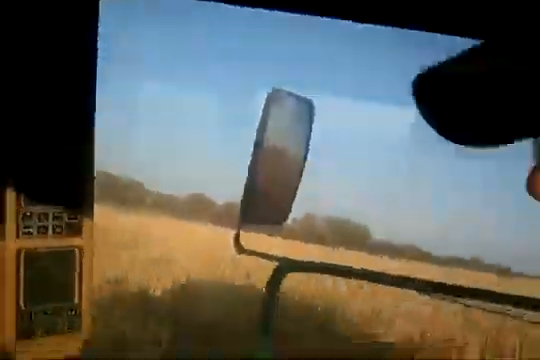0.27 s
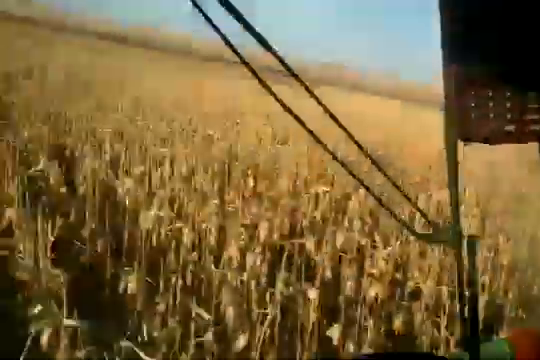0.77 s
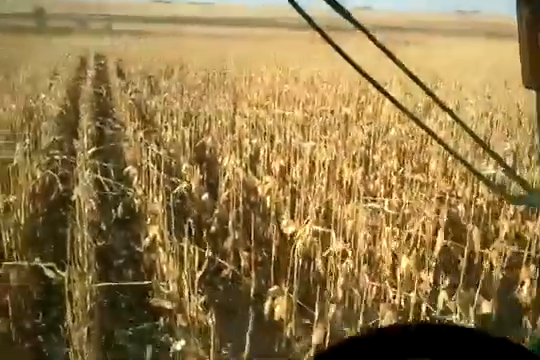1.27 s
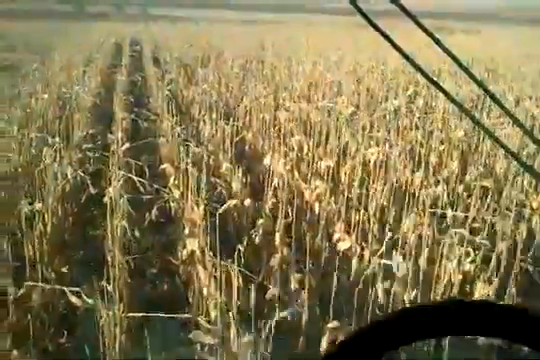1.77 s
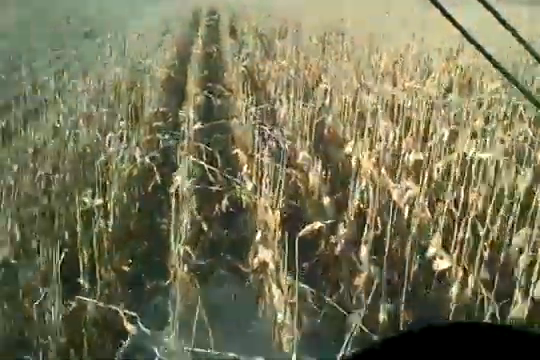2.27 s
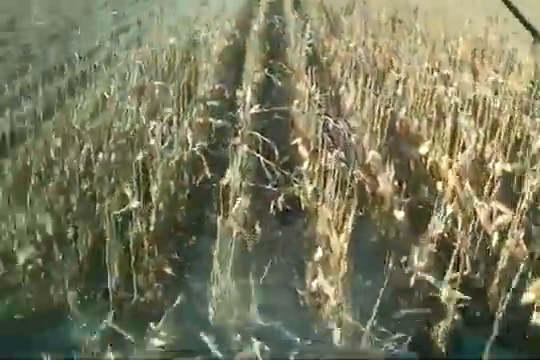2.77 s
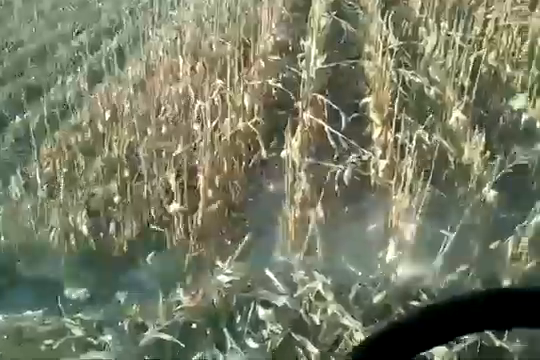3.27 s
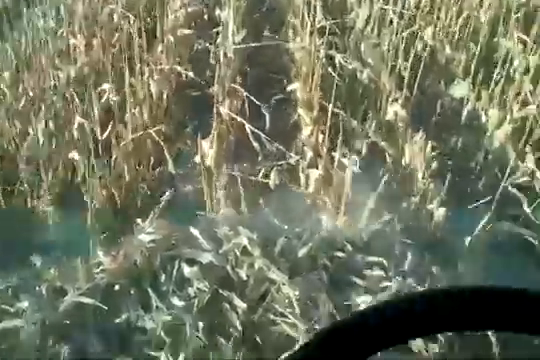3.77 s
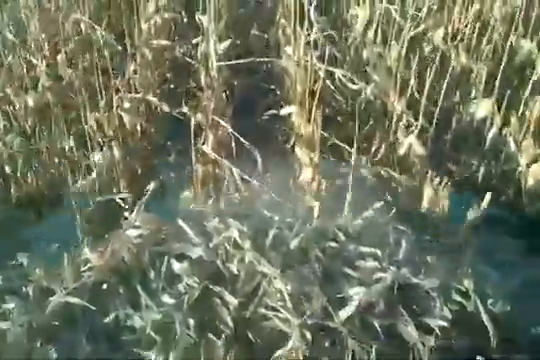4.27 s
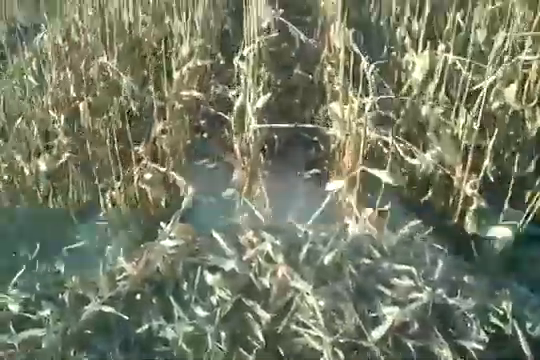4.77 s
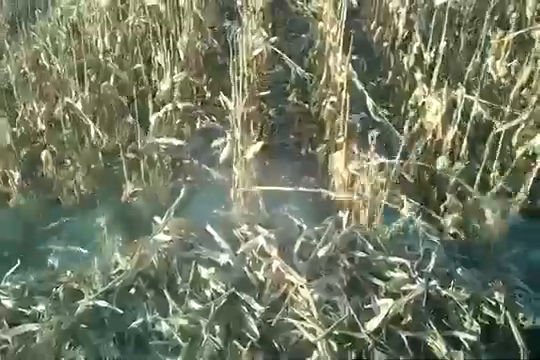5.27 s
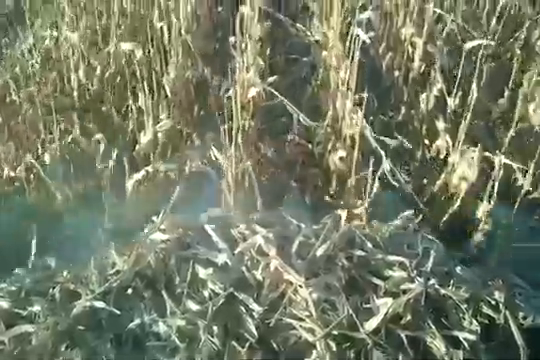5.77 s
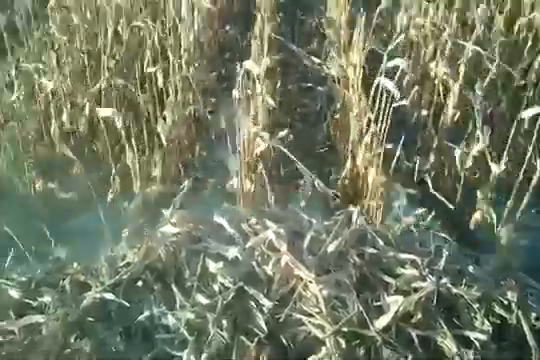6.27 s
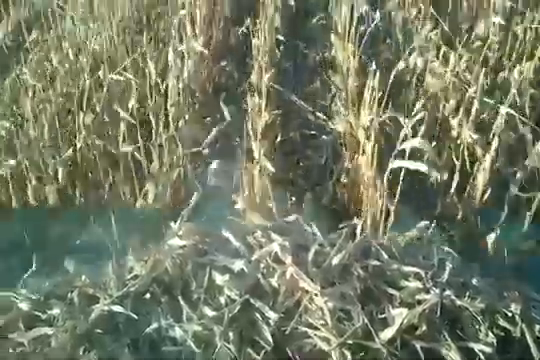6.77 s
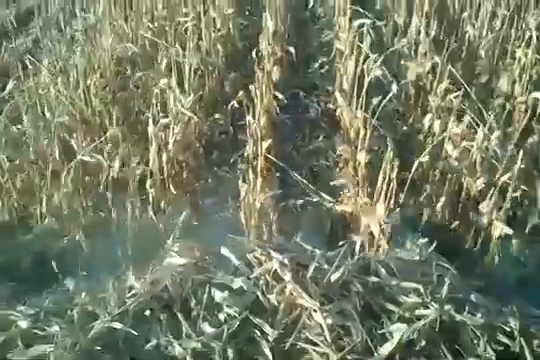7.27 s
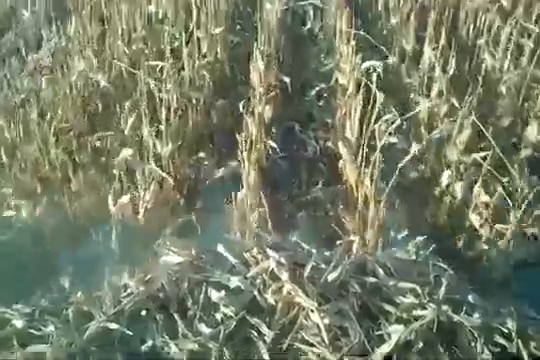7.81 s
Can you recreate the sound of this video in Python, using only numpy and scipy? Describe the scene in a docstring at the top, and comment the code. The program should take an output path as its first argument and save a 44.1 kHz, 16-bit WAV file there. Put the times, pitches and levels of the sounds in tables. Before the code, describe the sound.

From 0 s a combine harvester is already running under load, heard in its cab: deep throbbing of unbalanced shafts, floor boom, panel drone, engine and belt hums and a fan tone. A noisy, airy rush of dry crop hisses at the side, with a small clattering burst at once. From about 1 to 2 s the main gear whine comes forward, wavering, and the machine sags very slightly in pitch near 1.2 and 1.8 s. Between 2 and 4.5 s the microphone turns to the windscreen: the airy hiss thins while grainy stalk crackle and sheet-metal rattle grow, with sharper bursts around 3.6 s. A thin header whine also shows. From 5 to 8 s the steady roar continues with uneven surges, short low hum swells, more knocks near 7.2 and 7.5 s and another slight sag around 7.4 s. Bass overload pumps and roughens everything; it ends still running.

```python
"""Combine harvester, heard in the cab

A combine harvester cuts a dry standing crop. Sines make the throbbing unbalanced shafts, hums, fan and
gear whines; shaped noise makes the cab's boom and drone; random snaps and noise make the stalks and hiss.
Short sine swells unsettle the boom, drone and hum; decaying sines ring the header panels.
The microphone turns from the side window to the windscreen, and the loud bass overloads it."""
import sys
import numpy as np
from scipy import signal
from scipy.fft import rfft, irfft
from scipy.io import wavfile

SR = 44100
rng = np.random.default_rng(int(sys.argv[2]) if len(sys.argv) > 2 else 0)


def int16_out(signal):
    """Quantize to a 16-bit WAV file."""
    q = np.round(np.clip(np.atleast_2d(signal).T, -1, 1) * 32767)
    wavfile.write(sys.argv[1], SR, q.astype(np.int16))


N = 354652
TIME = np.arange(N) / SR  # s
BINS = np.fft.rfftfreq(N, 1 / SR)  # Hz

# uneven rise and fall of the rush, hiss and rattle: (time [s], level change [dB])
RUSH_LEVEL = [(0, -1), (.1, 0), (.2, 0.5), (.48, -0.3), (.57, 0.8), (.75, -1), (1.05, 0), (1.16, 1.1),
              (1.28, .5), (1.55, -0.5), (1.8, 1.2), (2, -1.5), (2.55, -1), (2.72, -2), (2.86, -0.5), (3, 0),
              (3.49, 0.2), (3.57, 1), (3.68, 2.2), (3.76, -1), (4.2, 2.5), (4.31, -3.5), (4.45, 1.4),
              (4.8, 0), (4.94, 1.5), (5.12, -.5), (5.42, 0.5), (5.8, -0.3), (6, 1.3), (6.38, -2), (6.55, 1),
              (6.76, 2.8), (6.9, -2.8), (7.08, -1.5), (7.22, 1.5), (7.35, -1), (7.52, 2.5), (7.68, -1),
              (8, 4)]
# spectrum of the rush, facing the header: (frequency [Hz], relative density [dB per Hz])
RUSH_FRONT = [(300, -3), (700, -1), (770, -3), (845, -1), (940, -1.5), (1050, 0), (1250, -0.5), (1480, 1),
              (1850, 1.4), (2150, -0.9), (2400, -1.7), (2700, -6), (3000, -10.5), (3600, -16.5),
              (5000, -36.5)]
# ringing modes of the header's sheet metal: (frequency [Hz], relative level [dB], t60 [s])
PANELS = [(839.4, 1.5, 0.094), (1043, -3, .06), (1365, -2.5, 0.13), (1521, -1, 0.08), (1747, -2, .06),
          (1850, -3.5, 0.056), (2020, -3.5, 0.058), (2470, -4, .05), (3100, -12, .03), (4350, -12, .02),
          (5770, -11.5, 0.013)]


def gain_of(db):
    """Decibels to amplitude."""
    return 10 ** (np.asarray(db) / 20)


def evened(x):
    """Scales to an rms of one."""
    return x / np.sqrt(np.mean(x ** 2) + 1e-20)


def blend(start, end, share):
    """Moves from start to end as share goes from zero to one."""
    return start + share * (end - start)


def follow(rows):
    """Columns of a timed table, interpolated to one value a sample."""
    s, *columns = np.transpose(rows)
    return [np.interp(TIME, s, column) for column in columns]


def humps(rows):
    """Sum of cosine-squared humps: (centre [s], full length [s], peak size)."""
    total = 0
    for centre_s, length_s, size in rows:
        position = np.clip((TIME - centre_s) / length_s, -.5, .5)
        total = total + size * np.cos(np.pi * position) ** 2
    return total


def wander(rate_hz):
    """Slow random curve of unit rms, with changes up to about the given rate."""
    spectrum = rfft(rng.standard_normal(N)) / (1 + (BINS / rate_hz) ** 4)
    return evened(irfft(spectrum, N))


def tone(hz, sway_rad=0):
    """Sine of unit rms along a pitch curve, its phase pushed by sway_rad."""
    return np.sqrt(2) * np.sin(2 * np.pi * np.cumsum(hz) / SR + sway_rad)


def coloured(x, spectrum):
    """Shapes x by a spectrum that falls away beyond both end points; unit rms."""
    hz, db = np.transpose(spectrum)
    shape = gain_of(np.interp(np.log(BINS + 1), np.log(hz), db))
    shape /= np.maximum(BINS / hz[-1], 1) ** 2
    shape *= np.minimum(BINS / hz[0], 1)
    return evened(irfft(rfft(x) * shape, N))


def resonate(x, hz, width_hz):
    """Resonance of gain one at a moving centre: shift to 0 Hz, one-pole low-pass, shift back."""
    turn = np.exp(2j * np.pi * np.cumsum(hz) / SR)
    r = np.exp(-np.pi * width_hz / SR)
    return 2 * (turn * signal.lfilter([1 - r], [1, -r], x / turn)).real


def snaps(per_s, spread_db, share):
    """Random snaps of uneven size; share is their part of the power, the rest is noise."""
    size = gain_of(spread_db * np.minimum(rng.exponential(1, N), 4))
    clicks = size * rng.choice([-1, 1], N) * (rng.random(N) < per_s / SR)
    share = np.clip(share, 0, 1)
    return np.sqrt(share) * evened(clicks) + np.sqrt(1 - share) * rng.standard_normal(N)


def shafts(speed, lean):
    """Unbalanced shafts shake the cab: fast beats with slow at 6.6 Hz, and with its twin in long waves."""
    fast_hz, slow_hz = 32.22, 25.65  # at full speed
    slow_db = -22
    # fast shaft's shake: (time [s], mean level [dB])
    shake = [(.3, -17), (.7, -21), (1.6, -17.5), (2.8, -17.5), (3.3, -18), (4.25, -18), (5.6, -19.5),
             (6.3, -15), (7.2, -15)]
    # times [s] when the slipping twin opposes the fast shaft
    cancels_s = [0, .87, 2.2, 3.63, 4.97, 6.66, 7.8, 9.2]
    sway_rad = 0.2 * wander(4.0)
    slip_rad = 2 * np.pi * np.interp(TIME, cancels_s, np.arange(len(cancels_s)))
    twin_share = blend(0.28, 0.55, lean)  # of the fast shaft's amplitude: seat, windscreen
    twin = twin_share * tone(fast_hz * speed, sway_rad - slip_rad)
    pair = tone(fast_hz * speed, sway_rad) - twin
    fast = gain_of(follow(shake)[0] + 1.0 * wander(2.0)) * pair
    slow = gain_of(slow_db + 1.2 * wander(1.4)) * tone(slow_hz * speed, 0.086 * wander(5.3))
    return fast + slow


def partials(table, speed, position, flutter_db, sway_rad, rate_hz):
    """Tones geared to the drive; the uneven load flutters each in level and phase."""
    out = np.zeros(N)
    for hz, start_db, end_db in table:
        level_db = blend(start_db, end_db, position) + flutter_db * wander(rate_hz)
        phase_rad = sway_rad * wander(rate_hz) + 2 * np.pi * rng.random()
        out += gain_of(level_db) * tone(hz * speed, phase_rad)
    return out


def drive(speed, facing, lean):
    """Gear whines, fan and hums; the cab's standing waves set how loud each is at the microphone."""
    whine_hz, header_hz, fan_hz = 1437.3, 2310.8, 516.6  # at full speed
    # main gear whine, coming and going: (time [s], mean level [dB])
    whine_levels = [(.12, -39), (.43, -30.5), (.52, -41), (.83, -39), (.95, -44), (1.03, -33.5),
                    (1.25, -30), (1.47, -32.5), (1.58, -35), (1.74, -32), (1.93, -31), (2, -46),
                    (2.15, -40), (2.33, -35), (2.55, -28.5), (2.8, -36.5), (3.1, -29.5), (3.55, -40),
                    (3.8, -31), (4.3, -34), (4.5, -33.5), (5.4, -34.5), (6.15, -38.5), (6.7, -35),
                    (7.4, -39.5), (8, -32)]
    # header drive's thin whine, louder as the microphone turns toward it: (time [s], mean level [dB])
    header_levels = [(.1, -41.5), (.75, -40.5), (1.1, -54), (1.5, -44), (2.05, -54), (2.45, -40),
                     (3.3, -39), (3.65, -33.5), (4.2, -43.5), (4.95, -32), (5.2, -36.5), (5.9, -36),
                     (7.3, -37.5), (8, -37.5)]
    # fan's blade tone, fading as the microphone turns away: (time [s], mean level [dB])
    fan_levels = [(.5, -30), (1.3, -25.5), (2.4, -26.5), (3.4, -29.5), (4.4, -30), (5.6, -36), (7.1, -29.5),
                  (7.5, -36), (8, -31.5)]
    # engine and belt hums: (full-speed frequency [Hz], mean level at seat [dB], at windscreen [dB])
    hum_rows = [(64.6, -31, -30), (105, -31, -27.5), (116.4, -25.5, -29), (148.3, -32, -42),
                (174.6, -38, -41), (248.3, -33, -31), (323.7, -34, -37), (391.6, -24.8, -37),
                (409.1, -30, -36), (485.8, -35.5, -36), (615, -47, -44), (647, -40, -50), (809, -47, -50)]
    # lesser gears: (full-speed frequency [Hz], mean level facing side window [dB], facing header [dB])
    gear_rows = [(1155.4, -50, -48), (2584.7, -51, -50), (2642.5, -44, -47.5)]
    whine_db = follow(whine_levels)[0] + 1.9 * wander(14) + 1.3 * wander(45)
    whine = gain_of(whine_db) * tone(whine_hz * speed, 0.53 * wander(20) + 0.2 * wander(60))
    header_db = follow(header_levels)[0] + 1.8 * wander(16)
    header = gain_of(header_db) * tone(header_hz * speed, 0.44 * wander(30))
    fan_db = follow(fan_levels)[0] + 2.4 * wander(24)
    fan = gain_of(fan_db) * tone(fan_hz * speed, 0.2 * wander(10))
    hums = partials(hum_rows, speed, lean, flutter_db=1.5, sway_rad=0.16, rate_hz=12)
    gears = partials(gear_rows, speed, facing, flutter_db=3.5, sway_rad=0.19, rate_hz=15)
    return whine + header + fan + hums + gears


def cab(lean):
    """The threshing shakes the floor and sets the panels droning: shaped noise."""
    boom_db, boom_lean_db = -17, 0.1  # at the seat; change toward the windscreen
    seat_db, front_db = -19.5, -20
    # floor boom: (frequency [Hz], relative density [dB per Hz])
    boom_spectrum = [(10, -18), (20, -9), (28, -3), (37, -1.5), (47, 5.5), (62, -2), (85, -1.5),
                     (104, -0.5), (116, -4.5), (130, -7), (180, -19.5), (400, -36)]
    # panel drone at the seat: (frequency [Hz], relative density [dB per Hz])
    seat_spectrum = [(90, -13), (120, -0.5), (150, 4), (175, 2), (205, -1.5), (245, 1), (280, -1),
                     (350, -7), (400, -2.5), (450, -8), (500, -7), (580, -14), (750, -17), (1500, -35.5)]
    # panel drone at the windscreen: (frequency [Hz], relative density [dB per Hz])
    front_spectrum = [(90, -22.5), (140, -2.5), (170, 0), (205, 0), (240, 2), (275, 1), (310, -5.5),
                      (355, -7.5), (400, -6.5), (450, -8.5), (495, -4.5), (570, -11), (750, -16.5),
                      (1500, -31)]
    boom = gain_of(boom_db + boom_lean_db * lean) * coloured(rng.standard_normal(N), boom_spectrum)
    seat = gain_of(seat_db) * coloured(rng.standard_normal(N), seat_spectrum)
    front = gain_of(front_db) * coloured(rng.standard_normal(N), front_spectrum)
    return boom + np.sqrt(1 - lean) * seat + np.sqrt(lean) * front


def crop(facing, lean):
    """Dry stalks break in the header in clumps: noise to the side, snaps and noise in front."""
    rush_side_db, rush_front_db = -26.5, -24  # before rush level and clumps
    chaff_side_db, chaff_front_db = -33, -33  # before rush level, clumps and the two changes below
    chaff_lean_db, chaff_turn_db = 9.5, -17.5  # side hiss: leaning up, turning away
    # stalk rush at the side window: (frequency [Hz], relative density [dB per Hz])
    rush_side = [(300, -14.5), (650, 3.5), (760, 1), (840, 5.5), (950, 3), (1100, 3), (1250, 2.5),
                 (1450, 0), (1750, -2), (2100, -4), (2600, -7.5), (3200, -19), (5000, -31)]
    # chaff hiss at the side window: (frequency [Hz], relative density [dB per Hz])
    chaff_side = [(1500, -21.5), (3000, 5.5), (4300, 7), (5000, 6), (5800, 4), (6400, 1), (6900, -8),
                  (7300, -19.5)]
    # chaff hiss facing the header: (frequency [Hz], relative density [dB per Hz])
    chaff_front = [(1500, -17), (3500, -7), (4300, -0.5), (4800, -2.5), (5400, 3), (5900, 2.5),
                   (6400, -4.5), (6900, -16.5), (7300, -40)]
    clumps_db = .5 * wander(60)
    side, front = np.sqrt(1 - facing), np.sqrt(facing)
    rush = side * gain_of(rush_side_db) * coloured(rng.standard_normal(N), rush_side)
    rush += front * gain_of(rush_front_db) * coloured(snaps(1500, 3.3, 0.4), RUSH_FRONT)
    hiss_db = chaff_side_db + chaff_lean_db * lean + chaff_turn_db * facing
    chaff = side * gain_of(hiss_db) * coloured(rng.standard_normal(N), chaff_side)
    chaff += front * gain_of(chaff_front_db) * coloured(snaps(1800, 3.1, 0.55), chaff_front)
    return gain_of(follow(RUSH_LEVEL)[0] + clumps_db) * (rush + chaff)


def tonal_swells():
    """Short unsteady swells of the cab's boom, drone and hum: sines under smooth humps."""
    # swells: (centre time [s], length [s], frequency [Hz], peak level before flutter [dB])
    swell_rows = [(0.41, 0.16, 248, -25), (0.592, 0.5, 104, -23), (.84, 0.18, 400, -24.5),
                  (1.025, 0.32, 119, -22), (1.17, 0.13, 403, -22.5), (1.306, 0.26, 133, -18),
                  (1.583, 0.54, 114, -16.5), (2.115, 0.31, 113.7, -22), (2.994, 0.14, 245, -21),
                  (3.406, 0.45, 113.7, -17.5), (3.797, 0.11, 402.6, -20), (3.856, 0.23, 116, -18.5),
                  (4.093, .3, 112.3, -16.5), (4.098, 0.2, 241.4, -25.5), (4.364, 0.13, 245, -24.5),
                  (4.743, 0.4, 109.3, -23), (5.25, 0.3, 105, -18), (6.063, .18, 239.7, -24),
                  (6.142, 0.23, 107.4, -19.5), (6.81, 0.17, 242.5, -22), (7.23, 0.13, 116.4, -18),
                  (7.653, 0.28, 106, -20.5), (7.687, 0.21, 238, -19.5), (7.93, 0.33, 246, -22)]
    sway_rad = 0.44 * wander(21)
    flutter = gain_of(2.0 * wander(27))
    out = np.zeros(N)
    for s, length_s, hz, db in swell_rows:
        swell = humps([(s, length_s, gain_of(db))])
        out += swell * tone(np.full(N, hz), sway_rad + 2 * np.pi * rng.random())
    return flutter * out


def ring(hz, db, t60_s):
    """One panel mode's dying ring: a decaying sine, 1/8 s long."""
    t = TIME[:SR // 8]
    return gain_of(db - 60 * t / t60_s) * np.sin(2 * np.pi * hz * t)


def rattle(facing):
    """The header's panels ring, each under its own uneven stream of random blows."""
    side_db, front_db = -38, -30.5  # before rush level
    blows_per_s, spread_db = 90, 2.5  # on each panel
    blows = np.zeros(N)
    for panel in PANELS:
        blows += signal.oaconvolve(snaps(blows_per_s, spread_db, 1), ring(*panel))[:N]
    level_db = blend(side_db, front_db, facing) + follow(RUSH_LEVEL)[0]
    return gain_of(level_db) * evened(blows)


def bursts():
    """Brief broadband bursts of decaying noise, with faint panel ringing by random amounts."""
    noise_decay_s, noise_db, ring_db = 0.0066, 1.5, -9  # levels relative to the row's
    # bursts: (time [s], reference level [dB])
    burst_rows = [(.062, -20), (1.436, -23), (1.851, -21), (3.149, -22), (3.557, -18), (3.67, -18),
                  (4.697, -21), (4.938, -19), (6.003, -25), (7.243, -20), (7.52, -21), (7.824, -25)]
    noise = coloured(rng.standard_normal(N), RUSH_FRONT)
    out = np.zeros(N + SR)
    for s, db in burst_rows:
        rings = sum(rng.standard_normal() * ring(*panel) for panel in PANELS)
        at = round(s * SR)
        t = TIME[:len(rings)]
        burst = np.roll(noise, -at)[:len(t)] * np.exp(-t / noise_decay_s)
        out[at:at + len(t)] += gain_of(db + noise_db) * burst + gain_of(db + ring_db) * rings
    return out[:N]


def air():
    """Air and fine chaff hiss in one broad, grainy band: snaps and noise through two resonances."""
    # band, shifting as the microphone turns: (time [s], centre [Hz], level before a 0.7 dB cut [dB])
    band_rows = [(0, 2720, -31.5), (.75, 2775, -32), (1, 3300, -33), (1.8, 3410, -33), (2.2, 3540, -33.5),
                 (2.4, 3950, -36.5), (2.85, 4040, -35), (3.05, 4310, -40), (3.6, 4320, -43.5),
                 (8.04, 4400, -49.5)]
    hz, level_db = follow(band_rows)
    band = resonate(snaps(1800, 3.0, .5), hz, 980)
    band = resonate(band, hz, 980)
    return gain_of(level_db - 0.7) * evened(band)


def scene():
    """Sums all that reaches the microphone; the shafts and drive tones sag together under load."""
    # microphone: (time [s], turn toward header [0-1], lean up to windscreen [0-1])
    pose = [(0, 0.03, 0.3), (1, 0.05, 0), (2, 0.05, 0.13), (2.5, 0.25, 0.1), (3, 0.55, 0.14),
            (3.8, 0.83, 0.35), (4.4, 0.9, 0.8), (4.8, 0.98, 0.91)]
    # brief sags under load: (centre time [s], length [s], peak share of speed lost)
    sags = [(1.2, .7, .0048), (1.84, .45, .0038), (7.4, .5, .0026)]
    facing, lean = np.clip(follow(pose), 0, 1)
    speed = 1 - humps(sags)
    machine = shafts(speed, lean) + drive(speed, facing, lean) + cab(lean) + tonal_swells()
    cutting = crop(facing, lean) + rattle(facing) + bursts()
    return (machine + cutting + air())[None]


def limited(x, ceiling, recovery_db_per_s):
    """Limiter: the gain drops at once on a peak and creeps back at a steady rate in dB."""
    over_db = np.maximum(20 * np.log10(abs(x) / ceiling + 1e-9), 0)
    fall_db = TIME * recovery_db_per_s
    return x / gain_of(np.maximum.accumulate(over_db + fall_db) - fall_db)


def record(dry):
    """The input sits off centre, so bass troughs pump the limiter and flatten; then the band limit."""
    gain_db, offset = 2.0, -.187
    edge_hz = 7280
    pumped = limited(gain_of(gain_db) * dry[0] + offset, ceiling=0.75, recovery_db_per_s=63.5)
    clipped = np.clip(pumped, -.71, .71)
    low_pass = signal.firwin(441, edge_hz, window=("kaiser", 4), fs=SR)
    return signal.oaconvolve(clipped, low_pass, "same")[None]


dry = scene()
out = record(dry)
int16_out(out)
```